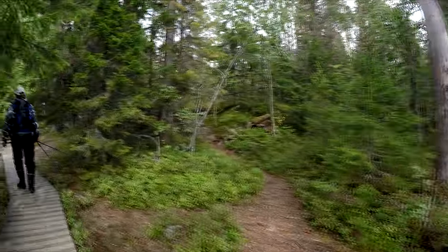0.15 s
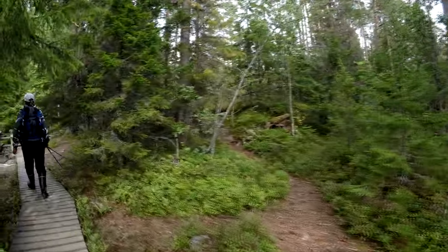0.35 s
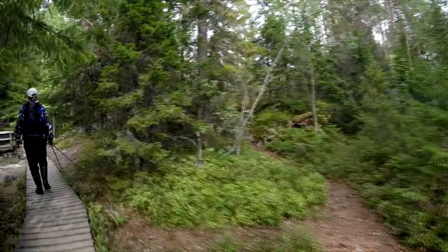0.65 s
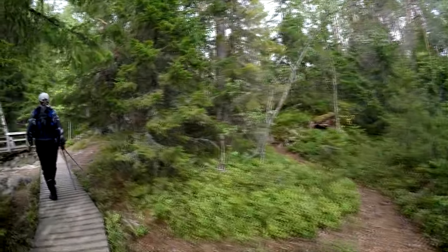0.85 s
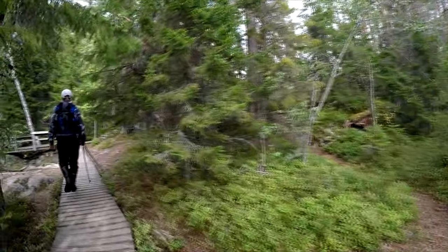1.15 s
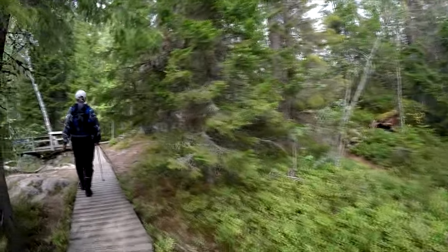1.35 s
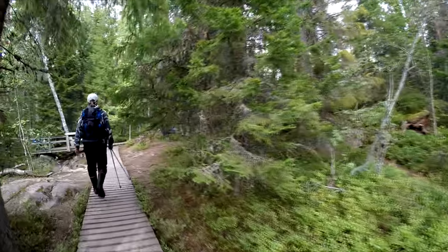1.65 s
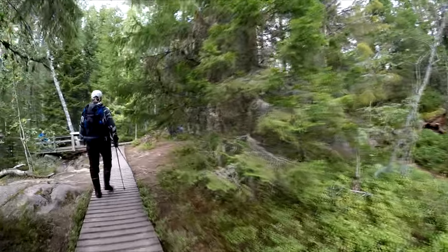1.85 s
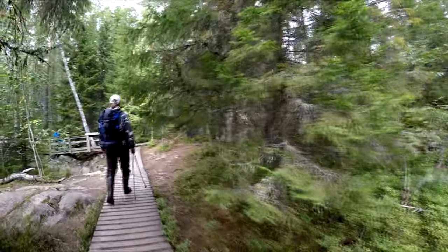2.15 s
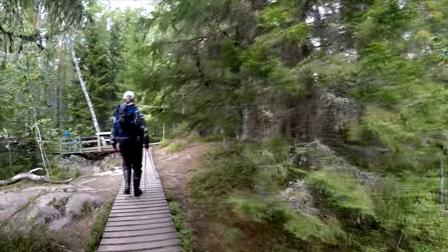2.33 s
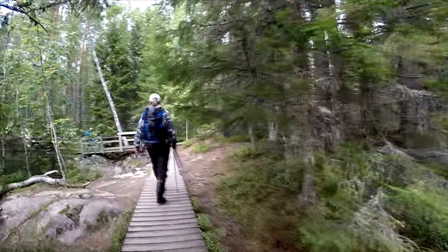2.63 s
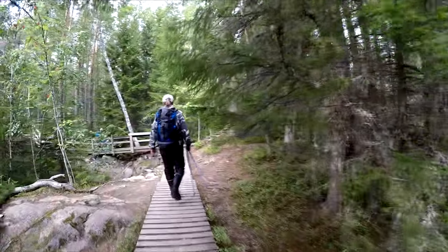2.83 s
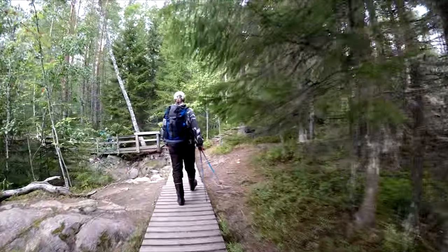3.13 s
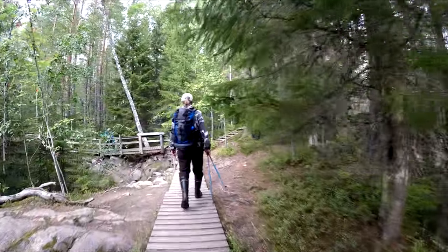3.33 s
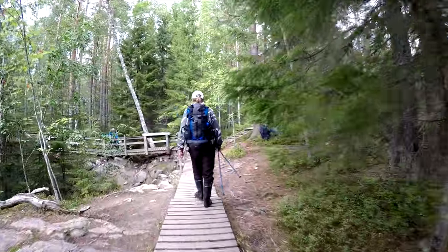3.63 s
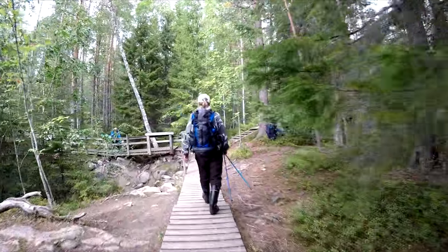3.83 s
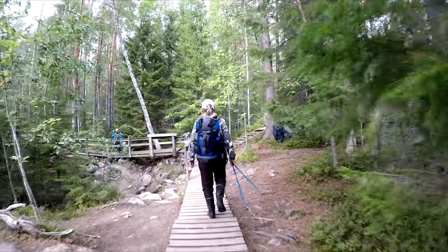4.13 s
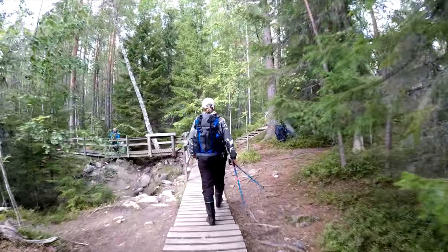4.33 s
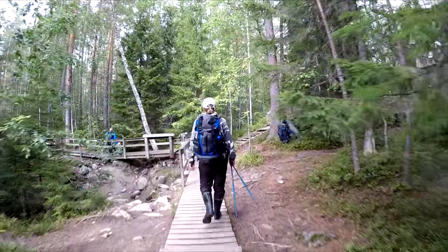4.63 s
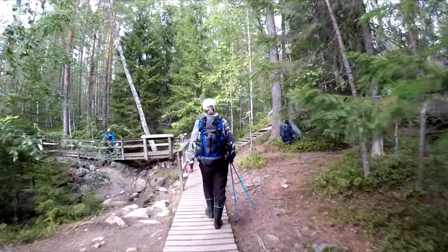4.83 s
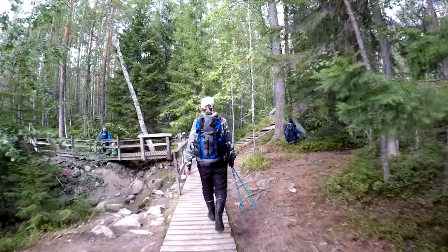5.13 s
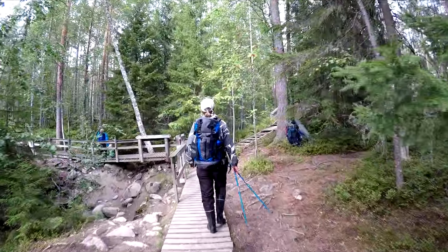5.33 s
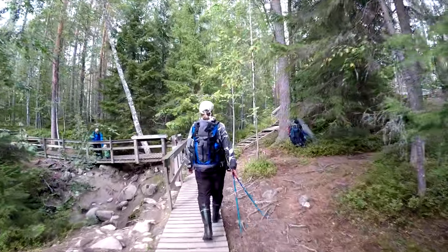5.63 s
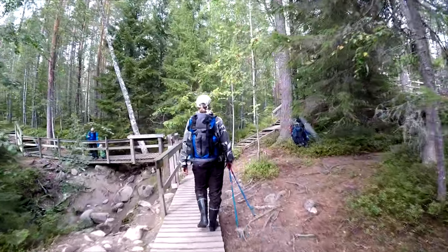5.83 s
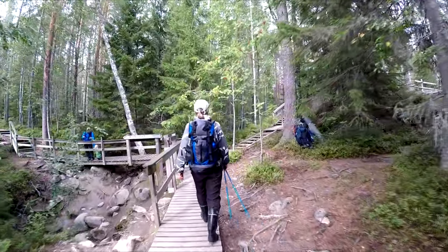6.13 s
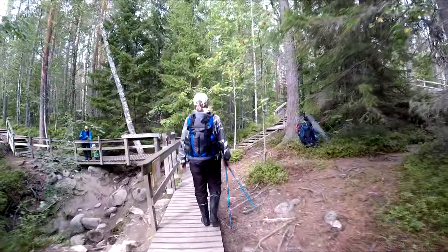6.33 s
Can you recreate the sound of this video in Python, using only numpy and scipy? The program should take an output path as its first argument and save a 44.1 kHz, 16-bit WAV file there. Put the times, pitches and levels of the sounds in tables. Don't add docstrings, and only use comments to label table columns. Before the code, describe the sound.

Steady heel-and-toe footsteps on short wooden boards, soft and thin at first, then louder and bassier, with rubbing clothes and small sharp clicks.

```python
import sys
import numpy as np
from scipy import signal
from scipy.fft import rfft, irfft, next_fast_len
from scipy.io import wavfile

SR = 44100
rng = np.random.default_rng(int(sys.argv[2]) if len(sys.argv) > 2 else 0)


def file_out(sig):
    cols = np.atleast_2d(sig).T
    lim = np.clip(cols, -1, 1)
    pcm = np.round(lim * 32767).astype(np.int16)
    wavfile.write(sys.argv[1], SR, pcm)


def nominal_scale(level):
    x = np.asarray(level, float) / 20
    return 10 ** x


N = 285327


def rms_one(x):
    return x / np.sqrt(np.mean(x ** 2) + 1e-20)


def band(x, low_hz, high_hz, order):
    return signal.sosfilt(signal.butter(order, [low_hz, high_hz], "band", fs=SR, output="sos"), x)


def drift(rate_hz):
    r = np.exp(-80 * np.pi * rate_hz / SR)
    slow = signal.lfilter([1], [1, -2 * r, r * r], rng.standard_normal(N // 40 + 2002))[2000:]
    return np.interp(np.arange(N) / 40, np.arange(len(slow)), rms_one(slow))


def coloured(spectrum):
    hz, db = np.transpose(spectrum)
    size = next_fast_len(N)
    log_hz = np.log(np.fft.rfftfreq(size, 1 / SR) + 1)
    shape_db = np.interp(log_hz, np.log(hz), db, left=-90, right=-90)
    noise = rfft(rng.standard_normal(size)) * nominal_scale(shape_db)
    return rms_one(irfft(noise, size)[:N])


def add(out, s, sound):
    at = round(s * SR)
    out[at:at + len(sound)] += sound[:N - at]


def peak_one(x):
    return x / np.abs(x).max()


def ring(hz, t60_s, rise_s, glide=0.0):
    t = np.arange(SR // 3) / SR
    turns = hz * (t + glide * 0.0046 * (1 - np.exp(-t / 0.004)))
    return np.sin(2 * np.pi * turns) * nominal_scale(-60 * t / t60_s) * (1 - np.exp(-t / rise_s))


# (frequency [Hz], level [dB per Hz])
LEAVES = [(280, -44), (480, 5), (558, -2), (737, -1.5), (958, -7), (1090, -16), (1180, -6), (1300, -14.5),
          (1510, -4), (1870, -15), (2040, -12), (2540, -21), (3200, -31.5), (4160, -21), (7040, -120)]
# (frequency [Hz], level [dB per Hz])
TREETOP_HISS = [(1880, -31), (3200, -10.5), (5510, -1.5), (6360, 0.5), (7670, -9), (10300, -7),
                (13100, -17), (15000, -15)]


def forest():
    rustle = nominal_scale(1.56 * drift(2.9)) * nominal_scale(-57) * coloured(LEAVES)
    hiss = nominal_scale(-63) * coloured(TREETOP_HISS)
    tone = np.sqrt(2) * nominal_scale(-79) * np.sin(2 * np.pi * 2000 * np.arange(N) / SR)
    return rustle + hiss + tone


# (low edge [Hz], high edge [Hz])
WEAVE_BANDS = [
    (1400, 3260),
    (4000, 6570),
    (7100, 9660),
]
# (peak time [s], rise [s], fall [s], level [dB])
SLEEVE_RUBS = [(.41, 0.15, .07, -60.5), (.52, .05, 0.26, -60), (.79, 0.052, 0.49, -60.5),
               (1.2, .1, 0.33, -66.5), (1.78, 0.027, 0.27, -60), (1.95, .2, 0.092, -59.5),
               (2.04, .1, .3, -60), (2.49, 0.2, .4, -62), (3.13, 0.045, 0.14, -55), (3.37, 0.18, 0.14, -60),
               (3.57, 0.046, 0.0089, -71), (3.8, .05, 0.26, -66.5), (4.4, 0.19, 0.036, -55),
               (4.5, 0.21, 0.063, -57), (4.85, 0.034, 0.0095, -51), (5.08, 0.18, 0.33, -59),
               (5.9, .05, .6, -69), (6.38, 0.28, 0.14, -60.5)]
# (peak time [s], rise [s], fall [s], level [dB])
SCUFF_RUBS = [
    (1.19, .08, .04, -63),
    (2.255, 0.021, 0.021, -49),
    (2.285, 0.0091, 0.032, -57.5),
    (3.1, .06, 0.12, -59),
    (3.22, 0.19, 0.032, -56),
    (3.75, .07, 0.027, -58.5),
    (4.68, 0.029, 0.035, -47),
    (4.705, 0.018, 0.099, -52.5),
    (5.73, 0.048, 0.08, -52),
    (5.84, 0.032, .03, -52.5),
]
# (peak time [s], rise [s], fall [s], level [dB])
NEEDLE_RUBS = [
    (4.05, 0.22, 0.17, -56),
    (4.18, 0.13, 0.12, -57),
    (4.26, 0.1, 0.027, -57),
    (4.63, 0.031, 0.026, -53.5),
]


def clothes():
    grains = rng.standard_normal((2, N)) * nominal_scale(1.76 * drift(146))
    t = np.arange(N) / SR
    rub_depth_db = 14
    power = np.outer(nominal_scale((-68, -71, -72.5)) ** 2, np.ones(N))
    kinds = [(SLEEVE_RUBS, (-3, 0.4, -10.5)),      # low, middle, bright [dB]
             (SCUFF_RUBS, (-1.7, -2.5, -12)),
             (NEEDLE_RUBS, (-0.7, 0, -2.7))]
    for rubs, weave_db in kinds:
        effort = np.zeros(N)
        for s, rise_s, fall_s, db in rubs:
            away = np.maximum((s - t) / rise_s, (t - s) / fall_s)
            effort += nominal_scale(db - rub_depth_db * away) ** 2
        power += np.outer(nominal_scale(weave_db) ** 2, effort)
    out = np.zeros(N)
    for k, (low_hz, high_hz) in enumerate(WEAVE_BANDS):
        weave = rms_one(band(grains[k % 2], low_hz, high_hz, order=2))
        out += np.sqrt(power[k]) * weave
    return out


# (time [s], length [s], pitch [Hz], width [Hz], level [dB])
SQUEAK_EVENTS = [
    (0.944, 0.031, 2010, 900, -66),
    (1.965, 0.028, 1800, 260, -57.5),
    (2.175, 0.008, 1900, 700, -56),
    (3.505, 0.0074, 1910, 255, -67),
    (3.742, 0.005, 1810, 1090, -47),
    (4.193, 0.08, 8900, 1590, -58),
    (4.691, 0.038, 3750, 980, -49.5),
    (5.791, 0.093, 800, 215, -65),
    (6.359, 0.12, 680, 135, -57),
]


def squeaks():
    out = np.zeros(N)
    for s, length_s, hz, width_hz, db in SQUEAK_EVENTS:
        noise = rng.standard_normal(SR // 4)
        narrow = rms_one(band(noise, hz - width_hz / 2, hz + width_hz / 2, order=2))
        swell = np.hanning(round(2 * length_s * SR))
        add(out, s - length_s, nominal_scale(db) * swell * narrow[-len(swell):])
    return out


# (time [s], peak level [dB], ring pitch [Hz])
TICK_EVENTS = [(0.3192, -38, 6220), (1.1736, -30.5, 5170), (1.544, -32.5, 2700), (1.5705, -36, 5130),
               (1.623, -37.5, 6400), (1.685, -33, 5270), (2.008, -35, 5920), (2.2149, -30, 5400),
               (2.248, -23, 3960), (2.2785, -23.5, 5100), (2.744, -33, 2100), (2.886, -36, 6740),
               (2.9442, -37, 2000), (3.558, -29, 5400), (3.7399, -40, 2320), (3.909, -34, 1980),
               (4.5156, -33, 6160), (4.6247, -29, 2390), (4.669, -41, 3690), (4.84, -19.5, 5550),
               (4.89, -35, 2090), (4.9796, -36, 4790), (4.998, -35, 2190), (5.038, -29, 2670),
               (5.25, -36, 6230), (5.459, -38, 6780), (5.7049, -34, 2260), (5.738, -26.5, 3060),
               (5.828, -24.5, 2730)]


def ticks():
    t60_s = 0.017
    out, t = np.zeros(N), np.arange(SR // 20) / SR
    for s, db, hz in TICK_EVENTS:
        trail = rng.standard_normal(len(t)) * nominal_scale(-60 * t / t60_s)
        snap = peak_one(band(2.7 * (t == 0) + trail, 3050, 7100, order=3))
        tone = ring(hz, t60_s, 0.00027)[:len(t)]
        add(out, s, nominal_scale(db - 6.0) * (0.35 * tone + 0.56 * snap))
    return out


def roll(rest_db, top_db, swell_s):
    power, t = np.full(N, nominal_scale(2 * rest_db)), np.arange(SR) / SR / swell_s
    for s, db, _, thud_db in HEEL_BLOWS:
        swell = (t * np.exp(1 - t)) ** 2
        add(power, s, nominal_scale(2 * top_db + db + thud_db + 25) * swell)
    return np.sqrt(power)


# (frequency [Hz], level [dB per Hz])
DEEP_RUMBLE = [(8.8, -44), (15, 2), (59, -2), (118, -6), (140, -3.5), (180, -47), (310, -120)]
# (frequency [Hz], level [dB per Hz])
HOLLOW_RUMBLE = [(53, -75), (90, -43), (161, 0.5), (286, -9), (328, -12.5), (398, -10.5), (445, -19.5),
                 (495, -29), (620, -21), (810, -48), (1360, -120)]


def rumble():
    deep = roll(rest_db=-40, top_db=-35, swell_s=0.089) * nominal_scale(1.73 * drift(4.6)) * coloured(DEEP_RUMBLE)
    hollow_roll = roll(rest_db=-45.5, top_db=-45, swell_s=0.077)
    return deep + hollow_roll * nominal_scale(1.26 * drift(15)) * coloured(HOLLOW_RUMBLE)


# (time [s], peak level [dB], pitch [Hz])
BEARER_SHAKES = [(1.141, -20, 42), (1.235, -24.5, 88.8), (1.551, -35.5, 65), (1.771, -24, 52.7),
                 (2.101, -35, 57.3), (2.317, -28, 38), (2.417, -21.5, 50), (2.61, -24.5, 44),
                 (2.749, -27, 38), (3.056, -26, 46.7), (3.157, -24, 38), (3.179, -24.5, 44),
                 (3.698, -15.5, 39), (3.768, -20.5, 37.4), (3.879, -27.5, 68.8), (4.357, -10, 47.8),
                 (4.518, -29.5, 37.7), (4.844, -22.5, 85.8), (5, -15.5, 45.8), (5.114, -19.5, 62),
                 (5.14, -32, 39.4), (5.209, -25.5, 44), (5.551, -25, 62), (5.69, -16, 65), (5.791, -32, 55),
                 (6.352, -14, 59.3)]


def bearers():
    out = np.zeros(N)
    for s, db, hz in BEARER_SHAKES:
        bearer = peak_one(ring(hz, 0.21, 0.0015, glide=0.72))
        add(out, s - 0.002, nominal_scale(db - 3.0) * bearer)
    return out


# (time [s], peak level [dB], lowest mode [Hz], thud over plank [dB])
HEEL_BLOWS = [
    (0.506, -31, 220, 2.5),
    (1.132, -30.5, 194, 1.5),
    (1.763, -28.5, 170, 0.5),
    (2.388, -23, 225, -17),
    (3.049, -20.5, 191, -6.5),
    (3.689, -25.5, 207, 2),
    (4.35, -23, 259, -2),
    (4.991, -24, 184, -15),
    (5.681, -20.5, 227, -8),
    (6.343, -20, 244, -2.5),
]
# (time [s], peak level [dB], lowest mode [Hz])
TOE_BLOWS = [
    (0.605, -24.5, 217),
    (1.232, -28, 259),
    (1.849, -31.5, 250),
    (2.461, -32, 223),
    (3.147, -22, 167),
    (3.783, -34, 196),
    (4.449, -26, 227),
    (5.11, -24, 163),
    (5.785, -27, 228),
]
# (time [s], peak level [dB], lowest mode [Hz], thud over plank [dB])
STRAY_BLOWS = [(0.523, -31, 223, -20), (0.692, -39, 192, -16), (0.914, -38, 218, -11),
               (1.546, -43.5, 169, 4), (1.803, -29.5, 173, -5), (1.815, -31, 151, -9),
               (2.099, -28, 178, -17), (2.249, -26.5, 265, -8), (2.262, -31, 270, -8),
               (2.411, -29.5, 216, -22), (2.521, -31.5, 226, -22), (3.063, -25, 229, -11),
               (3.737, -34.5, 215, -2), (3.874, -35.5, 214, -16), (3.952, -31.5, 167, -2),
               (4.512, -29.5, 182, -22), (4.839, -26, 235, 2), (5.036, -34, 235, -6),
               (5.729, -27.5, 185, -27), (6.088, -31.5, 168, 0.5), (6.174, -33, 190, -22),
               (6.239, -37, 164, 3.5), (6.387, -30, 196, -15)]


def blows():
    toe_thud_db = -13.5
    return HEEL_BLOWS + [row + (toe_thud_db,) for row in TOE_BLOWS] + STRAY_BLOWS


# (ratio to lowest mode [1], level [dB], ring time ratio [1])
PLANK_MODES = [
    (0.954, 6, 1),
    (1.453, -5, 0.73),
    (1.923, -13.5, 0.28),
]


def plank_knock(hz, t60_s, contact_s, luck):
    modes = [nominal_scale(mode_db + 5.3 * k) * ring(hz * ratio, t60_s * share, 0.69 * contact_s, glide=0.5)
             for (ratio, mode_db, share), k in zip(PLANK_MODES, luck)]
    return peak_one(sum(modes))


def boots():
    out, t = np.zeros(N), np.arange(SR // 3) / SR
    crack = band(rng.standard_normal(N), 480, 2000, order=2)
    for s, db, hz, thud_db in blows():
        luck = rng.standard_normal(len(PLANK_MODES))
        contact_s = 0.0026 * np.exp(-0.0317 * (db + 21))
        t60_s = 0.15 if 2.2 < s < 2.55 else 0.056
        plank = plank_knock(hz, t60_s, contact_s, luck)
        hardness = (0.0035 / contact_s) ** 2
        grit = np.resize(crack[round(s * SR):], len(t))
        sole = hardness * nominal_scale(-19.0) * grit * np.exp(-t / 0.0028)
        add(out, s + 0.000995, nominal_scale(db) * (sole - plank))
        thud = peak_one(ring(112 * (1 + 0.05 * luck[0]), 0.056, 0.0022, glide=0.19))
        add(out, s + 0.00574, nominal_scale(db + thud_db + 5.0) * thud)
    return out


def scene():
    return (forest() + clothes() + squeaks() + ticks() + rumble() + bearers() + boots())[None]


# (frequency [Hz], width [Hz], level left [dB])
HOUSING_NOTCHES = [
    (562, 297, -43.5),
    (1104, 140, -2),
]


def housing(sound):
    for hz, width_hz, db in HOUSING_NOTCHES:
        w, a = 2 * np.pi * hz / SR, np.pi * width_hz / SR
        left = a * nominal_scale(db)
        sound = signal.lfilter([1 + left, -2 * np.cos(w), 1 - left], [1 + a, -2 * np.cos(w), 1 - a], sound)
    return sound


# (time [s], level [dB])
BASS_OPENING = [
    (0, -38),
    (.52, -34),
    (.62, -13.5),
    (.8, -14),
    (1.08, -8),
    (1.2, -7.5),
    (1.5, -1),
    (2.0, 1),
    (6.47, 1),
]


def wind_filter(sound):
    cut = signal.sosfiltfilt(signal.butter(8, 145, "high", fs=SR, output="sos"), sound)
    s, db = np.transpose(BASS_OPENING)
    opened = nominal_scale(np.interp(np.arange(N) / SR, s, db))
    return opened * sound + (1 - opened) * cut


def top_cut(x):
    return signal.sosfilt(signal.butter(12, 15190, fs=SR, output="sos"), x)


def record(dry):
    heard = wind_filter(housing(dry))
    mix = signal.sosfilt(signal.cheby2(12, 60, 15600, fs=SR, output="sos"), heard)
    return top_cut(mix)


dry = scene()
out = record(dry)
file_out(out)
```